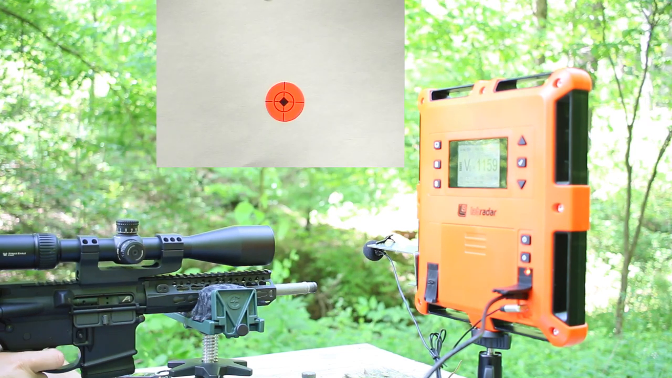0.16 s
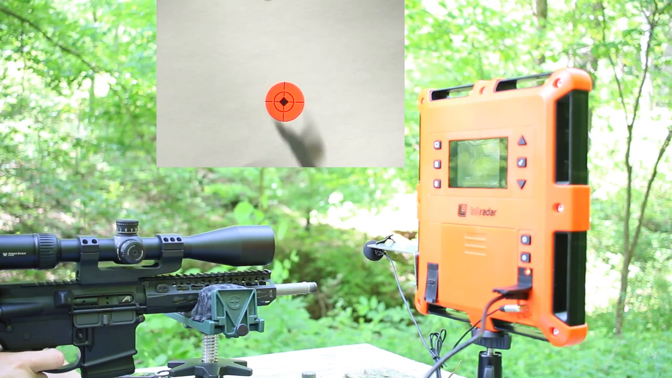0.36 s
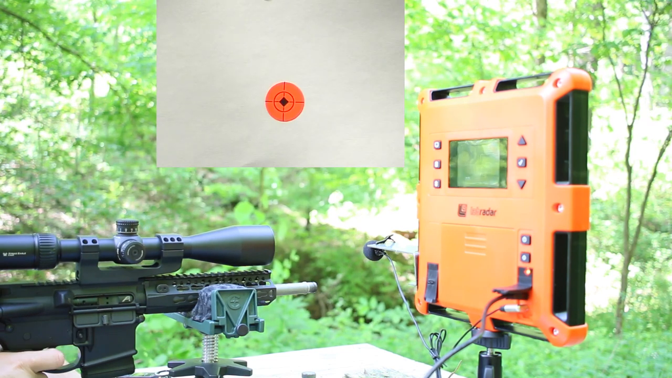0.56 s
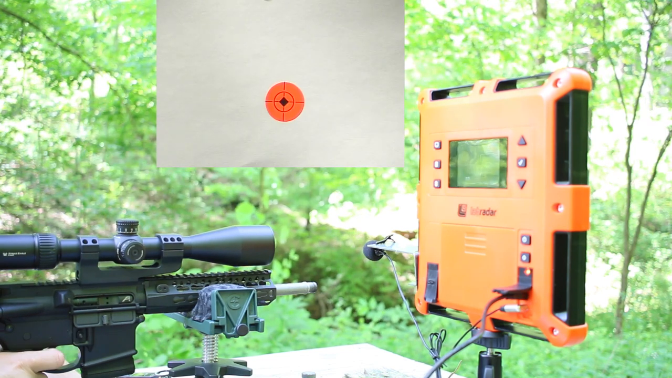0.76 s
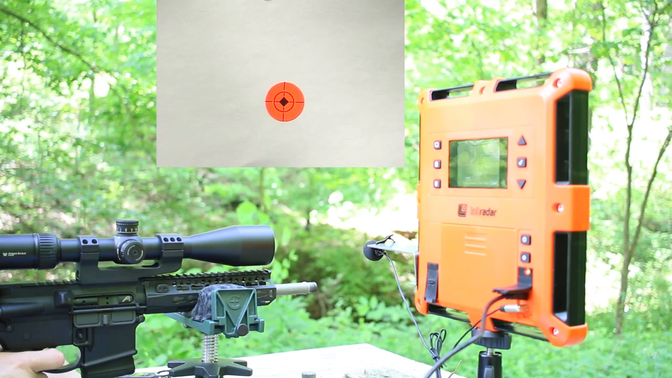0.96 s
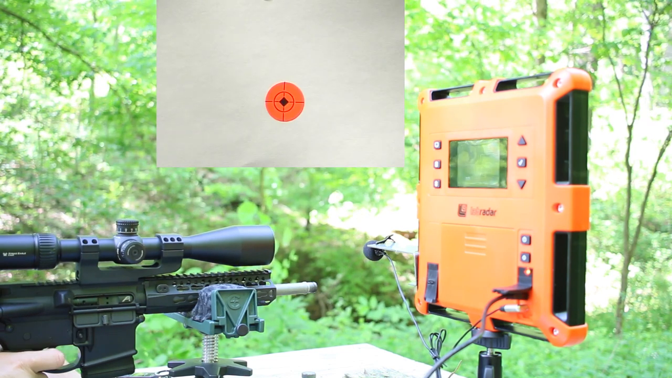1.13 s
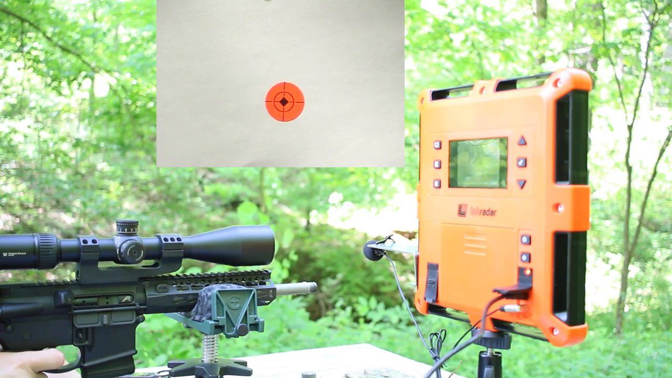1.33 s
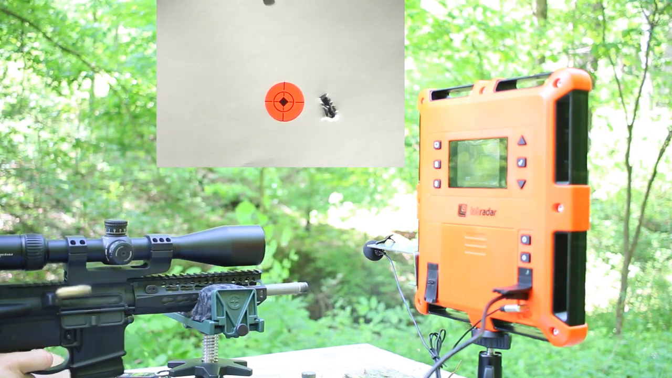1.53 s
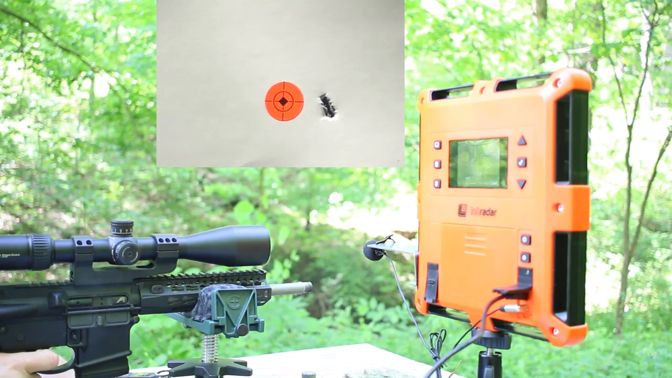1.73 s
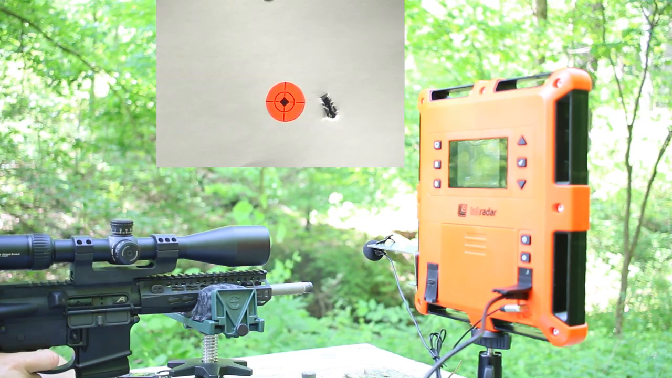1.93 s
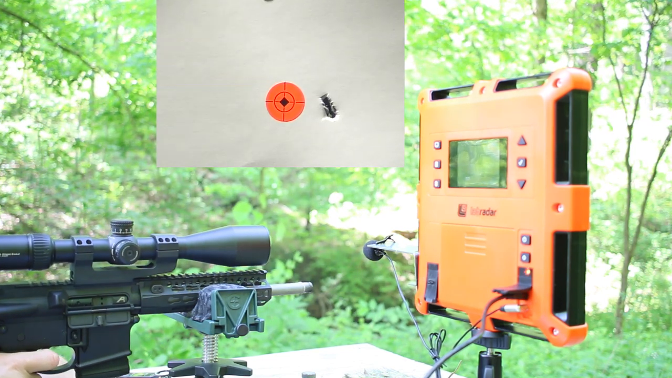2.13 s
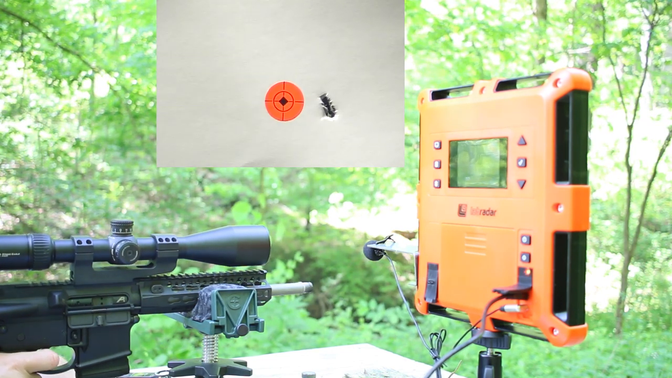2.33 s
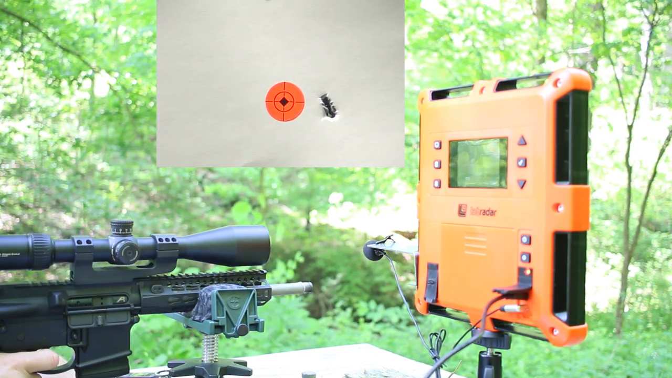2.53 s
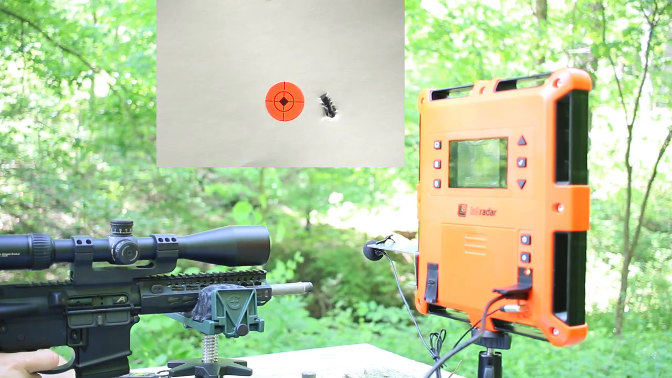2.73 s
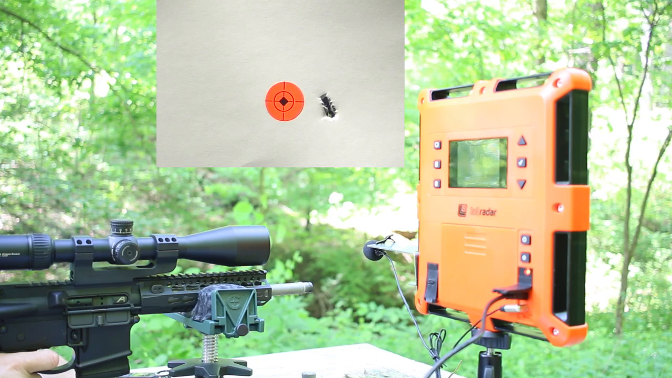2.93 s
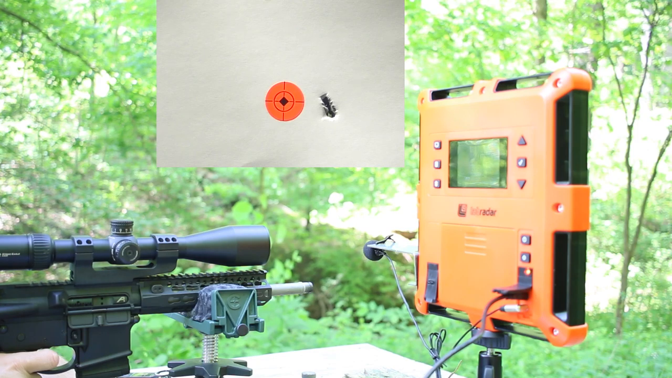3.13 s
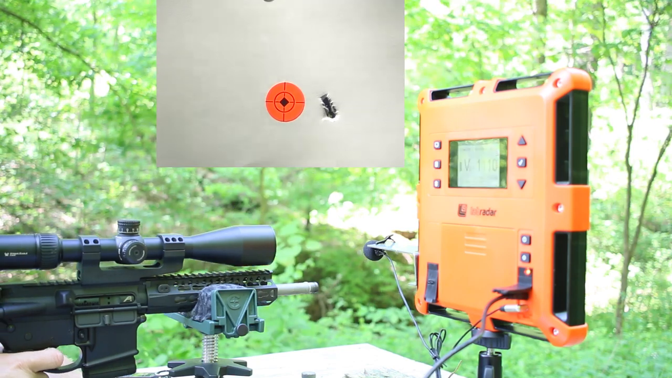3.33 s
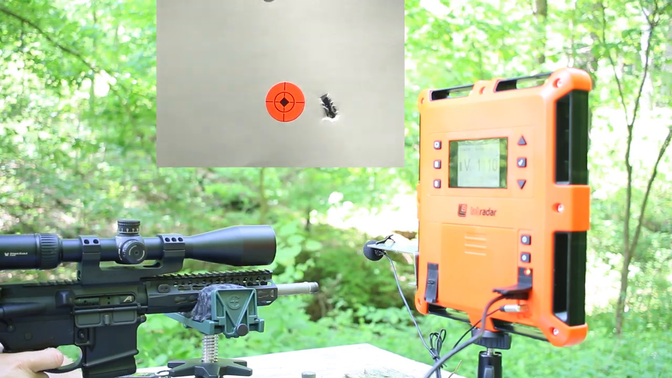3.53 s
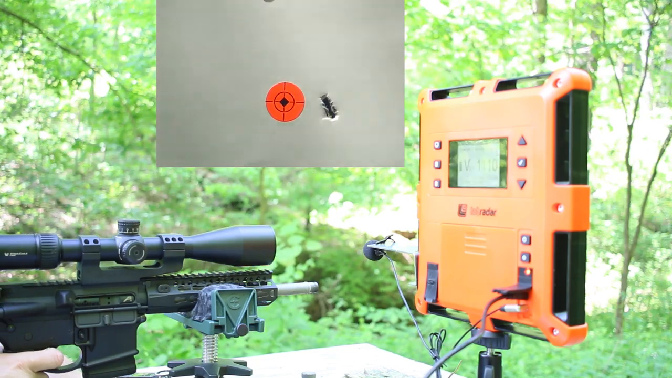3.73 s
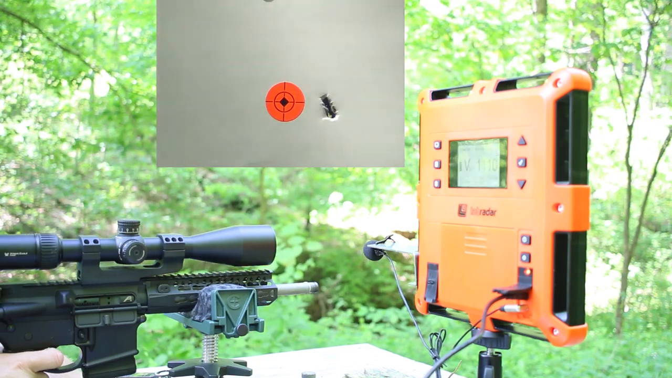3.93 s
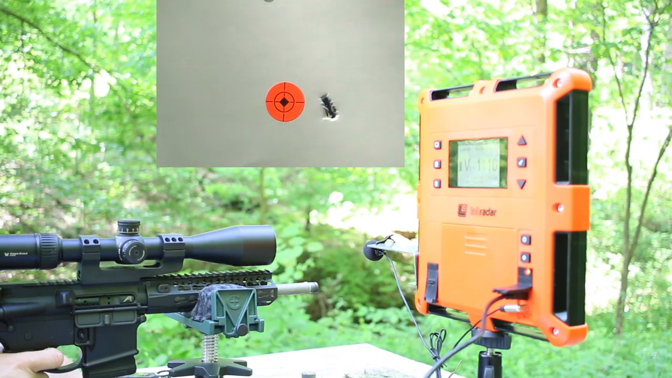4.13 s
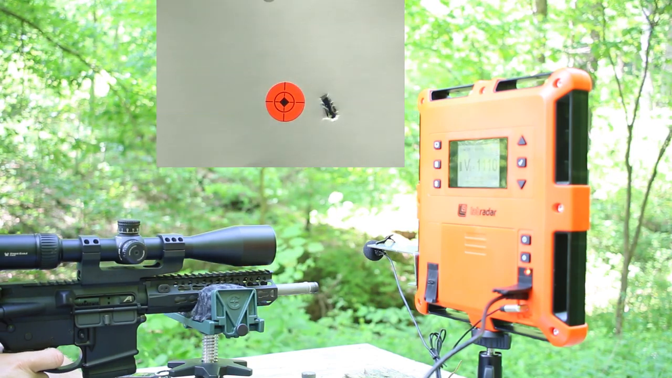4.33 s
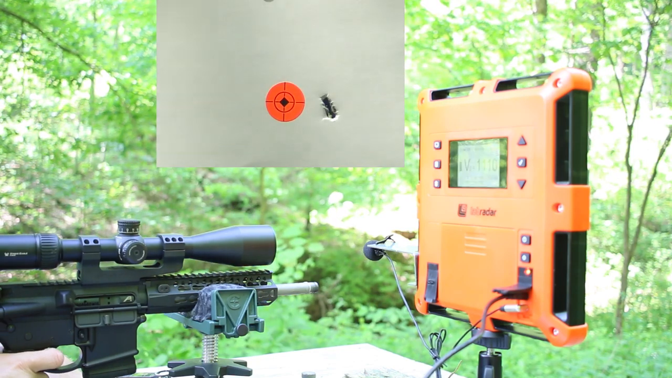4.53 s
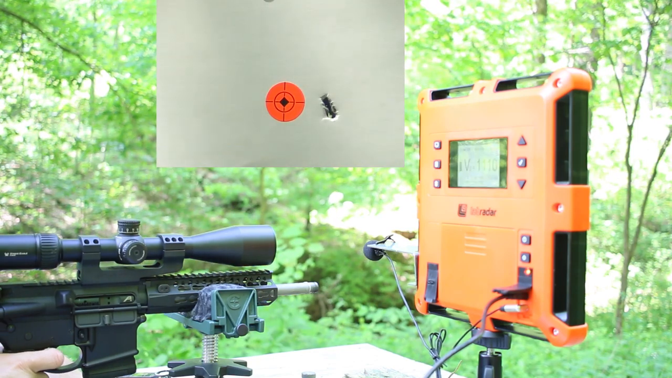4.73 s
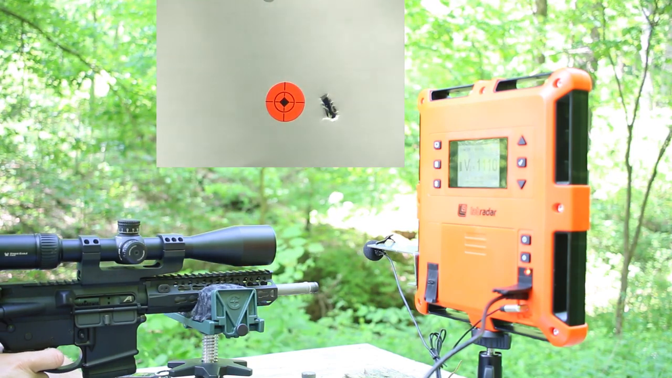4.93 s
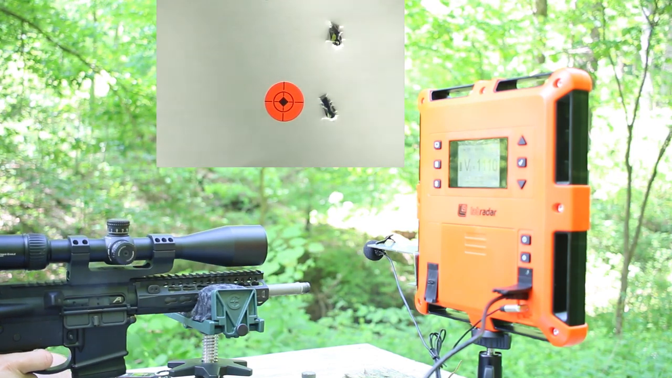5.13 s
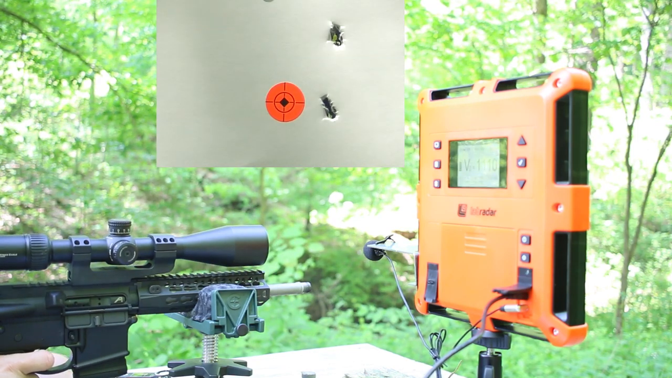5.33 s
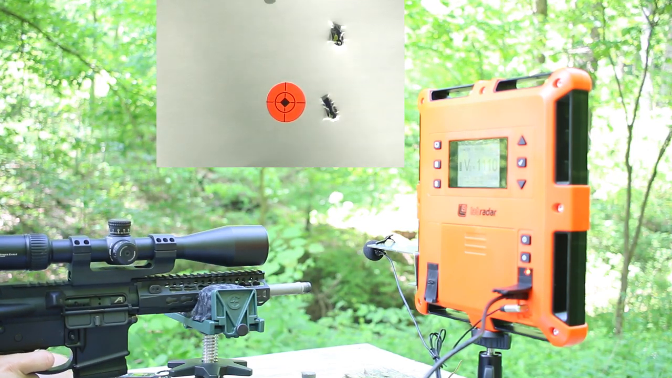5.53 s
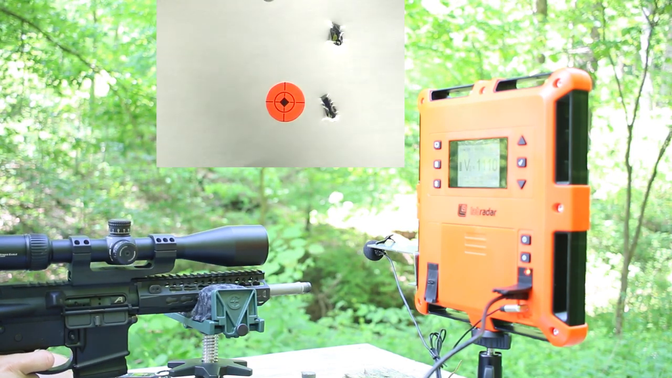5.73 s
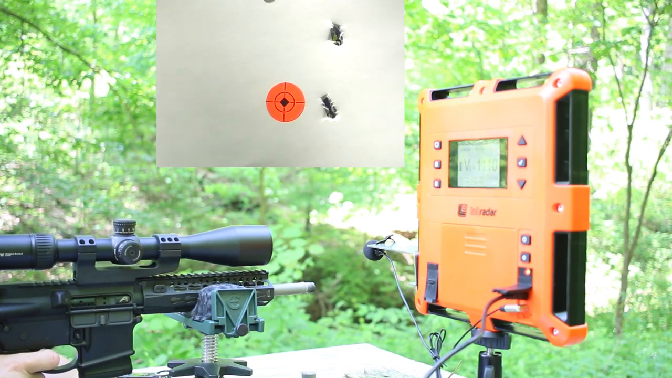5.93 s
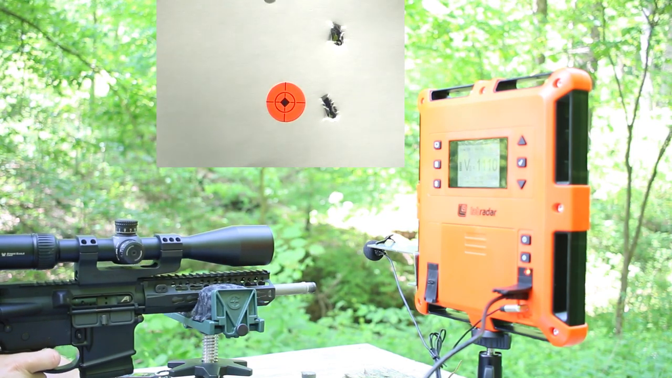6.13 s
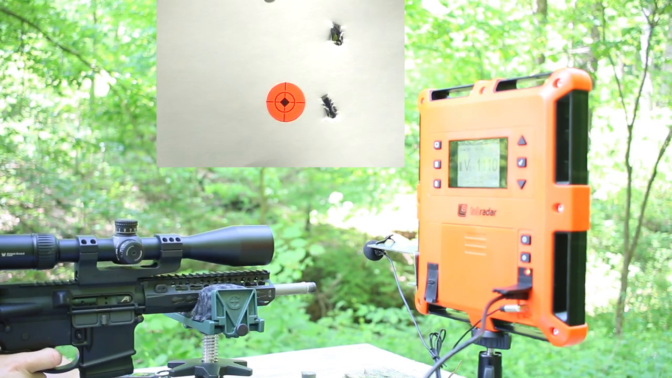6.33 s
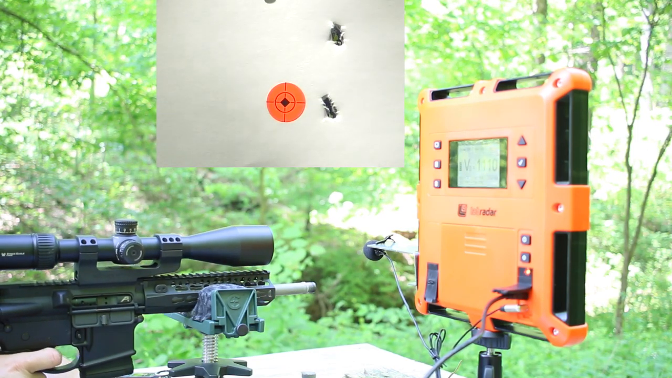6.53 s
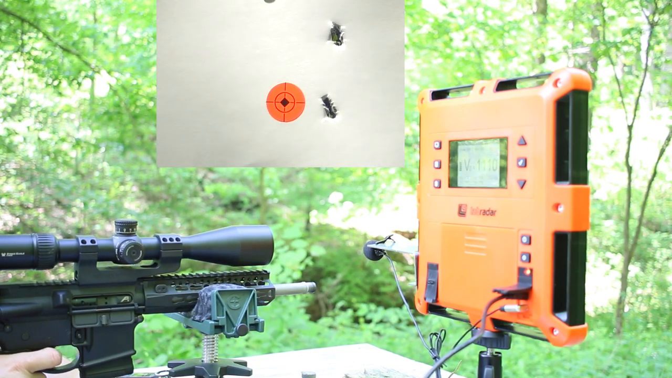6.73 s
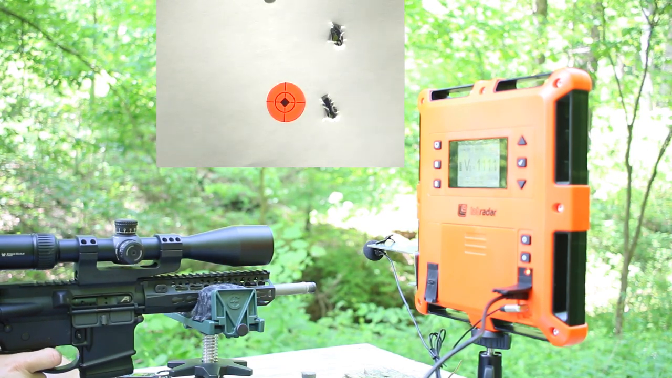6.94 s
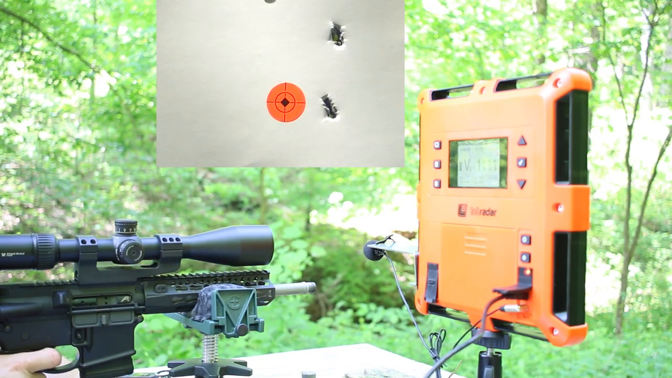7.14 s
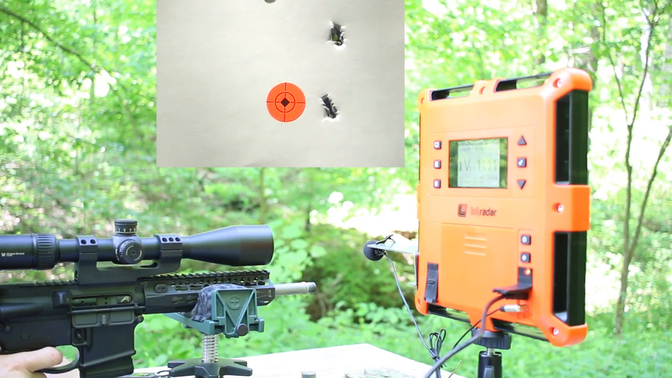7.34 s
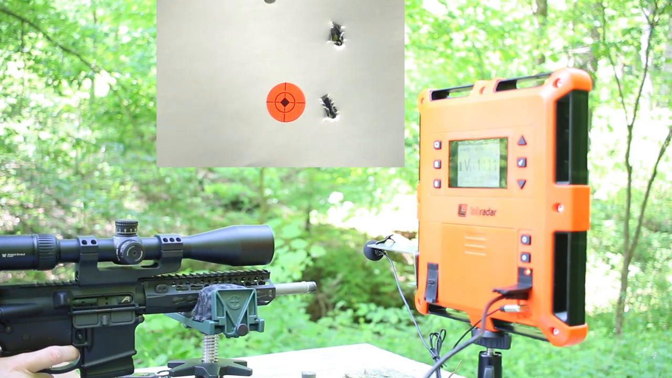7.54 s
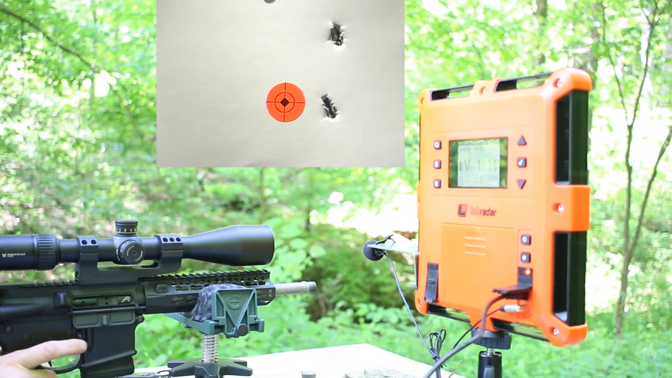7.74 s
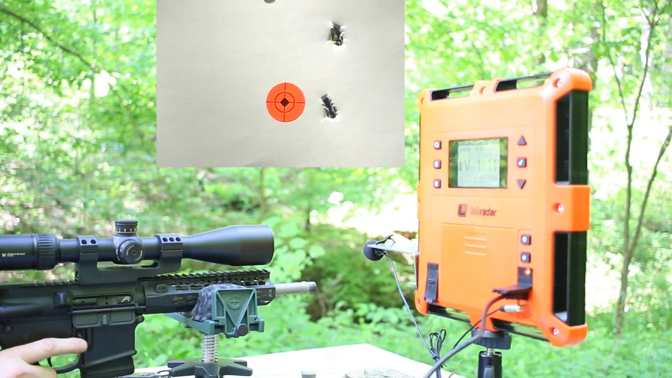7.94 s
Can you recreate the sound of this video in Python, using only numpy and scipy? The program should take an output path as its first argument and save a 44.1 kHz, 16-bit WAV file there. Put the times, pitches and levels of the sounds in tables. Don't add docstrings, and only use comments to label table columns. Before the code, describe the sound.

Close outdoor microphone at a shooting bench among trees. Faint leaf hiss and low wind, then a violent distorted rifle blast with thump, bolt clack and slapping echoes. An abrupt cut drops to near silence before the second blast rolls off through the woods. One crisp metallic click comes next, followed by soft grip rubbing, small ticks and dull bench knocks.

```python
import sys
import numpy as np
from scipy import signal
from scipy.fft import rfft, irfft
from scipy.io import wavfile
from scipy.ndimage import uniform_filter1d

SR = 44100
rng = np.random.default_rng(int(sys.argv[2]) if len(sys.argv) > 2 else 0)


def gain_from_db(level_db):
    decades = np.asarray(level_db, float) / 20
    return 10 ** decades


def to_wav(sig):
    pcm = np.clip(np.atleast_2d(sig), -1, 1) * 32767
    pcm = np.round(pcm).astype(np.int16)
    wavfile.write(sys.argv[1], SR, pcm.T)


N = 355887


def evened(x):
    return x / np.sqrt(np.mean(x ** 2) + 1e-20)


def read(points, hz):
    f, value = np.transpose(points)
    return np.interp(np.log(hz + 1), np.log(f + 1), value)


def add(mix, start_s, sound):
    part = mix[round(start_s * SR):][:len(sound)]
    part += sound[:len(part)]


def coloured(noise, spectrum):
    hz = np.fft.rfftfreq(len(noise), 1 / SR)
    return evened(irfft(rfft(noise) * gain_from_db(read(spectrum, hz)), len(noise)))


def air():
    # f/Hz, level/dB per Hz
    wash = [(12, -33), (20, -4), (40, -4), (86, -11), (120, -8.5), (180, -20.5), (236, -16.5), (313, -22),
            (500, -18.5), (1050, -28), (2490, -36), (6660, -40), (11900, -50), (12800, -63.5)]
    # f/Hz, level/dB, waver/Hz
    hum = [
        (117, -78.5, 1.4),
        (231, -79, .6),
        (1440, -95, .5),
    ]
    out = gain_from_db(-67.5) * coloured(rng.standard_normal(N), wash)
    for hz, db, waver_hz in hum:
        drift = evened(uniform_filter1d(rng.standard_normal(N), 6000))
        phase = 2 * np.pi * np.cumsum(hz + waver_hz * drift) / SR
        out += gain_from_db(db) * np.sqrt(2) * np.sin(phase)
    return out


def burst(db, hz, width_hz, t60):
    t = np.arange(12000) / SR
    rise_s = 0.05 * t60
    swell = 1 - np.exp(-(t / rise_s) ** 2)
    puff = rng.standard_normal(len(t)) * swell * gain_from_db(-60 * t / t60)
    edges = np.clip([hz - width_hz / 2, hz + width_hz / 2], 30, SR / 2.2)
    puff = signal.sosfilt(signal.butter(3, edges, "band", fs=SR, output="sos"), puff)
    return gain_from_db(db) * puff / abs(puff).max()


def blast():
    t = np.arange(SR // 2) / SR
    return gain_from_db(27) * (1 - t / 0.00067) * np.exp(-t / 0.0006)


def thump(delay, height, half_width_s):
    t = np.arange(SR // 2) / SR
    return height * np.exp(-((t - delay) / half_width_s) ** 2)


def dying(noise, spectrum, t60):
    grid = dict(nperseg=256, noverlap=192)
    hz, t, z = signal.stft(coloured(noise, spectrum), SR, **grid)
    fade = gain_from_db(-60 * t / read(t60, hz)[:, None])
    return signal.istft(z * fade, SR, **grid)[1][:len(noise)]


def slap(db, hz):
    t = np.arange(-600, 600) / SR
    cycles = 1.35
    return gain_from_db(db) * np.exp(-(t * hz / cycles) ** 2) * np.cos(2 * np.pi * hz * t)


def woods(trees):
    # f/Hz, level/dB per Hz
    near_colour = [(35, -50), (60, -25), (150, -10), (320, -4.5), (450, -3.5), (700, -11), (850, -4),
                   (1300, -9.5), (1910, -1.5), (2700, -14), (4200, -12), (6740, -9.5), (9000, -22.5),
                   (16000, -28.5)]
    # f/Hz, t60/s
    near_t60 = [(60, 0.67), (250, 0.73), (600, 0.83), (2000, .55), (5000, .55), (8000, .5), (11000, .4),
                (16000, 0.33)]
    # f/Hz, level/dB per Hz
    far_colour = [(35, -44.5), (60, -28), (180, -24), (320, -13.5), (440, -5), (600, -5.5), (850, -11.5),
                  (980, -16.5), (1950, -14.5), (2350, -23), (7600, -21), (8800, -29), (12500, -32.5),
                  (16000, -36)]
    # f/Hz, t60/s
    far_t60 = [(60, 2.5), (250, 2.4), (550, 2.57), (900, 2.337), (2100, 1.75), (3000, 1.42), (6000, 1.15),
               (9000, .85), (12500, 0.52), (16000, .5)]
    # delay/s, size/dB, f/Hz
    slap_list = [(.076, -1, 442.7), (.1, -2.5, 568.5), (.138, 3, 572.8), (.173, 0, 600), (.249, 0.5, 610),
                 (.269, -1.5, 716), (.342, 0, 514), (.409, 4.5, 520), (.449, -6, 479), (.497, -5, 550),
                 (.535, -5.5, 544), (.567, -7, 430), (.619, -5, 573), (.702, 1.5, 540), (.789, 1.5, 535.3),
                 (.891, -3, 524), (.942, 0.5, 594.8), (.966, -8, 527), (1.034, -2.5, 540),
                 (1.137, -1, 562.4), (1.246, -3, 598), (1.408, -6, 500), (1.588, -0.5, 568),
                 (1.668, 0.5, 510), (1.75, 1, 515), (1.832, 3, 576), (1.893, 5, 473), (1.983, 6.5, 570),
                 (2.067, 7, 560), (2.244, 7, 505)]
    t = np.arange(trees.shape[1]) / SR
    same = np.clip(0.95 - 0.24 * t, 0, 1)
    paths = same * trees + np.sqrt(1 - same ** 2) * rng.standard_normal(trees.shape)
    near = gain_from_db(3.5) * dying(paths[0], near_colour, near_t60) * (1 - np.exp(-t / 0.0012))
    far = gain_from_db(-12) * dying(paths[1], far_colour, far_t60) * (1 - np.exp(-t / 0.027))
    slaps, shade = np.zeros(len(t)), np.zeros(len(t))
    fall_db_per_s = 25
    for delay, db, hz in slap_list:
        start = delay - 0.009
        add(slaps, start, slap(-2 + db - fall_db_per_s * delay, hz))
        add(shade, start, signal.windows.hann(1200))
    low = signal.sosfiltfilt(signal.butter(2, 1100, fs=SR, output="sos"), near + far)
    return near + far + slaps - 0.37 * np.minimum(shade, 1) * low


def shot(shot_s, trees):
    # delay/s, peak level/dB, centre f/Hz, width/Hz, t60/s
    action = [
        (-.0048, -8, 5980, 10010, .016),
        (.0002, 15.5, 6557, 2501, 0.022),
        (.003, 18.5, 460.1, 259.8, .08),
        (.003, 15, 881, 219.7, .06),
        (.003, 15.5, 3600, 4970, .15),
        (.079, 10.5, 7185, 3000, 0.036),
        (0.5334, -24.5, 5140, 5400, 0.015),
        (0.5333, -50, 12000, 7000, 0.009),
    ]
    # delay/s, height, half width/s
    thumps = [
        (.016, 2.5, .008),
        (.085, -.35, .003),
        (.093, 0.33, .007),
        (.14, -.03, .04),
        (.27, .012, 0.022),
    ]
    out = np.zeros(N)
    add(out, shot_s, woods(trees))
    add(out, shot_s, blast())
    for delay, *shape in action:
        add(out, shot_s + delay, burst(*shape))
    for push in thumps:
        add(out, shot_s, thump(*push))
    return out


def hand():
    # f/Hz, level/dB per Hz
    rub = [(1500, -41.5), (2500, -15), (3500, -9.5), (5000, -5), (6800, 0.5), (8200, -8.5), (9500, -15.5),
           (12000, -25), (16000, -28.5)]
    # f/Hz, level/dB per Hz
    rumble_colour = [(12, -32), (20, -1), (81, -5), (118, -8), (200, -1.5), (467, -11.5), (528, -5.5),
                     (2500, -21), (3250, -55), (5500, -120)]
    # peak t/s, hold/s, hiss level/dB, rumble level/dB
    slides = [(2.75, .03, -71, -51.5), (2.86, .1, -75, -63), (3.02, 0.084, -74, -61), (5.851, .1, -67, -90),
              (5.99, .1, -60, -90), (6.5, .04, -75, -60), (6.62, .015, -74, -74), (6.73, .02, -78, -61),
              (7.19, .02, -79, -67), (7.437, .11, -64.5, -61.5), (7.56, .08, -59.5, -59),
              (7.678, .05, -62, -62.5), (7.733, .03, -59, -60.5), (7.8, 0.062, -65.5, -64),
              (7.88, 0.058, -62, -64.5), (7.97, .1, -79, -80)]
    # t/s, peak level/dB, centre f/Hz, width/Hz
    ticks = [(2.718, -60, 7500, 6000), (2.754, -52, 2500, 4000), (3.003, -55, 4200, 8000),
             (3.024, -51, 4000, 5000), (5.891, -65, 9000, 5000), (6.724, -66, 7000, 2500),
             (7.347, -63, 4410, 700), (7.742, -37.5, 2810, 5170), (7.82, -57, 5000, 6000),
             (7.859, -54, 2500, 3000), (7.947, -52, 1700, 500)]
    # t/s, peak level/dB, centre f/Hz
    knocks = [(7.408, -50, 853), (7.432, -49, 850), (7.509, -44.5, 217), (7.672, -47, 306),
              (7.689, -51, 900), (7.704, -36.5, 643), (7.743, -47, 610), (7.795, -53, 380),
              (7.82, -53, 450), (7.971, -51.5, 450), (7.445, -52, 50), (7.61, -50, 45)]
    t = np.arange(N) / SR
    grain = gain_from_db(1.6 * evened(uniform_filter1d(rng.standard_normal(N), 300)))
    hiss = evened(grain * coloured(rng.standard_normal(N), rub))
    rumble = evened(grain * coloured(rng.standard_normal(N), rumble_colour))

    peak_s, hold_s, hiss_db, rumble_db = np.transpose(slides)[:, :, None]
    rise_db_per_s, fall_db_per_s = 129, 500
    coarse = t[::64]
    before = np.maximum(peak_s - coarse, 0)
    after = np.maximum(coarse - peak_s - hold_s, 0)
    stroke_db = -rise_db_per_s * before - fall_db_per_s * after
    out = hiss * np.interp(t, coarse, gain_from_db((stroke_db + hiss_db).max(0)))
    out += rumble * np.interp(t, coarse, gain_from_db((stroke_db + rumble_db).max(0)))

    add(out, 7.54, burst(-58, 11500, 7000, 0.25))
    for tick_s, *shape in ticks:
        add(out, tick_s, burst(*shape, t60=0.012))
    for knock_s, db, hz in knocks:
        add(out, knock_s, burst(db, hz, 0.95 * hz, 11 / hz))
    return out


def snap():
    # f/Hz, level/dB, t60/s
    modes = [(1700, -10, 0.01), (3600, -20, 0.015), (4978, 0, 0.0084), (5320, -7.5, .008),
             (5860, -10, 0.0091), (6910, -7.5, .01), (7470, -6, 0.0076), (7470, -6, 0.0073),
             (8100, -3, 0.006), (810, -28, 0.03)]
    # f/Hz, level/dB per Hz
    scatter_colour = [(300, -39), (1500, -8), (3000, -9), (4000, 0.5), (7500, 1), (10000, -15),
                      (16000, -38.5)]
    t = np.arange(SR // 2) / SR
    ring = np.zeros(len(t))
    for hz, db, t60 in modes:
        phase = 2 * np.pi * rng.random()
        ring += gain_from_db(db - 60 * t / t60) * np.sin(2 * np.pi * hz * t + phase)
    ring = ring * (1 - np.exp(-(t / 0.0007) ** 2))
    out = gain_from_db(4.5) * ring / abs(ring).max()
    add(out, 0, burst(-4.5, 5600, 10000, 0.014))
    add(out, 0, burst(-39, 110, 200, 0.076) + burst(-36, 470, 500, 0.025))
    fade = gain_from_db(-32.5 - 60 * t / 0.026) + gain_from_db(-47.5 - 60 * t / 0.15) + gain_from_db(-60.5 - 60 * t / 0.88)
    scatter = coloured(rng.standard_normal(len(t)), scatter_colour)
    return out + scatter * fade * (1 - np.exp(-t / 0.0022))


def scene():
    shots = [
        1.5592,
        5.0752,
    ]
    change_s, change_fade_s = 3.337, 0.0035
    trees = rng.standard_normal((2, 3 * SR))
    t = np.arange(N) / SR
    first = shot(shots[0], trees) * np.clip((change_s - t) / change_fade_s, 0, 1)
    mix = first + shot(shots[1], trees)
    add(mix, 6.2566, snap())
    return (mix + hand() + air())[None]


def roll_off(x):
    return signal.sosfilt(signal.butter(12, 16500, fs=SR, output="sos"), x)


def record(dry):
    clipped = np.clip(dry, -1.06, 1.06)
    lowpass = signal.firwin(255, 15900, window=("kaiser", 9), fs=SR)
    limited = signal.oaconvolve(clipped, lowpass[None], "same")
    return roll_off(np.clip(limited, -1, 1))


dry = scene()
out = record(dry)
to_wav(out)
```